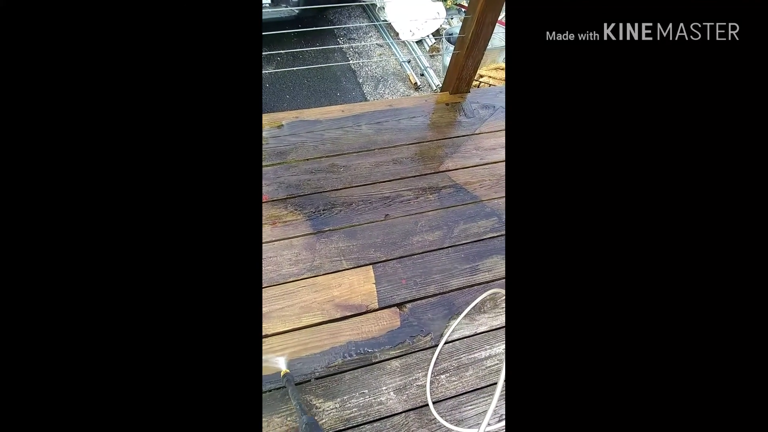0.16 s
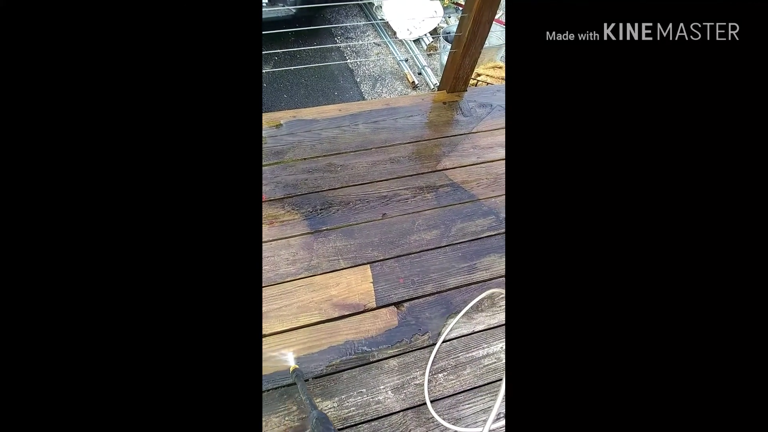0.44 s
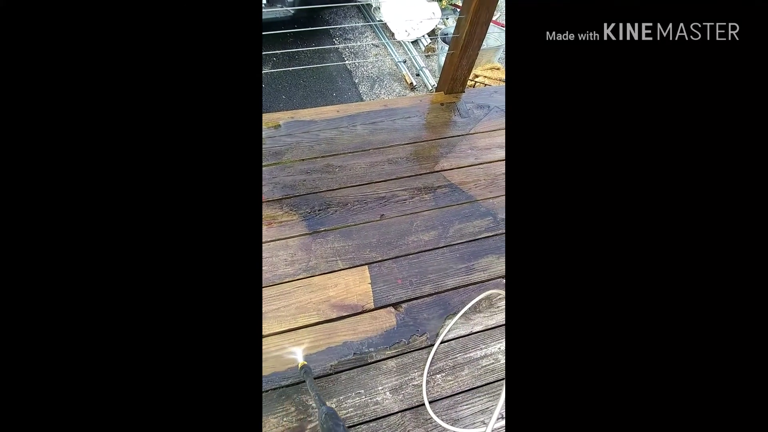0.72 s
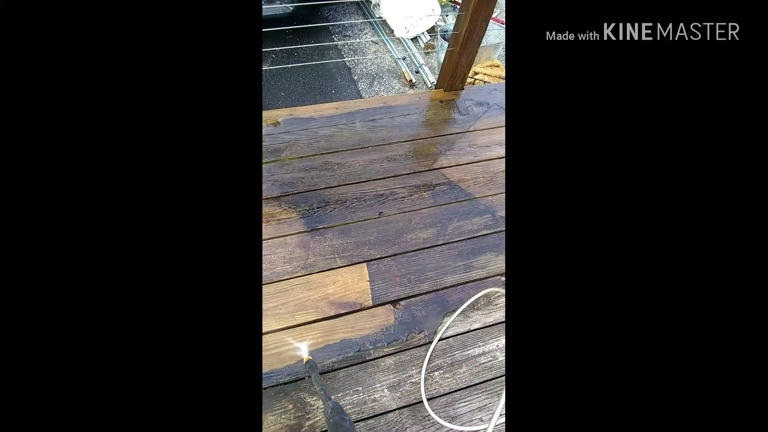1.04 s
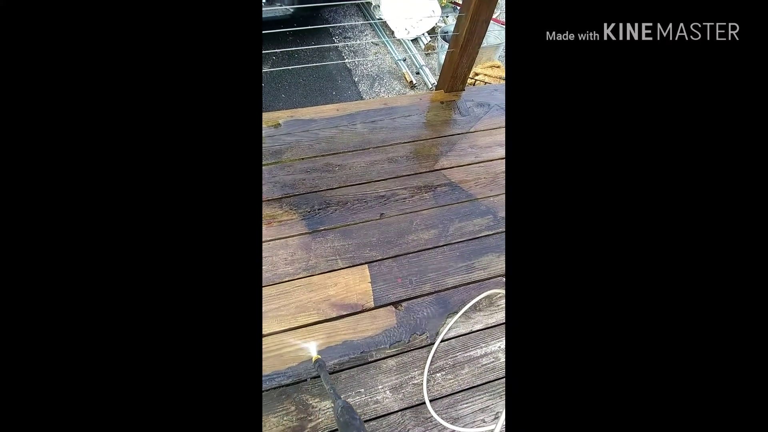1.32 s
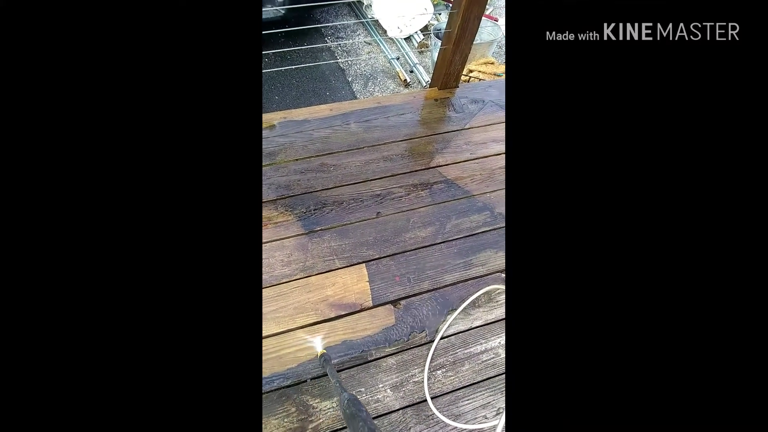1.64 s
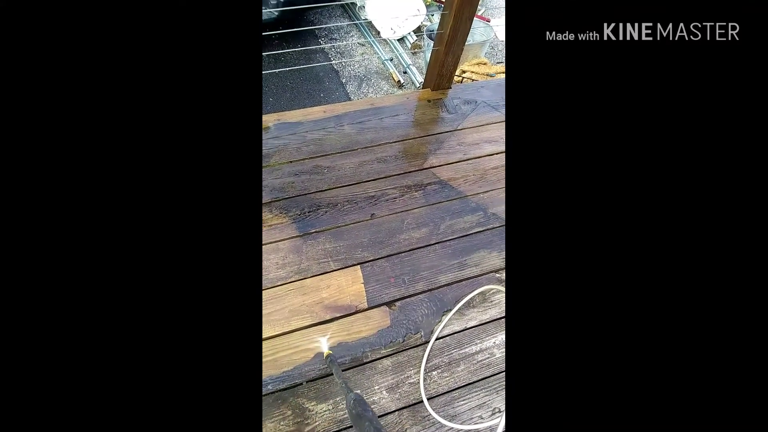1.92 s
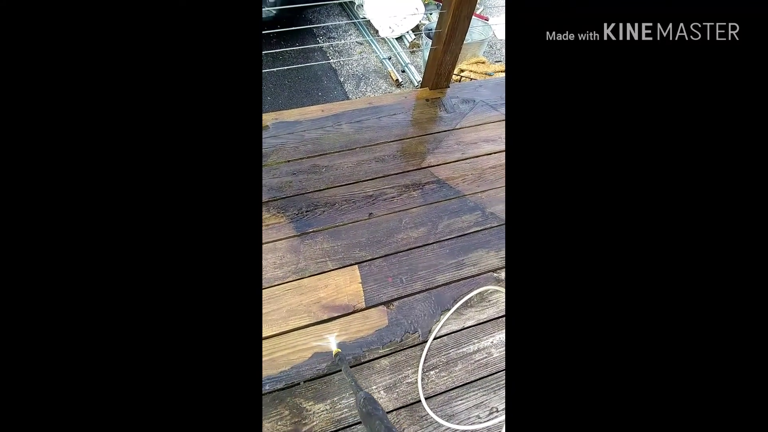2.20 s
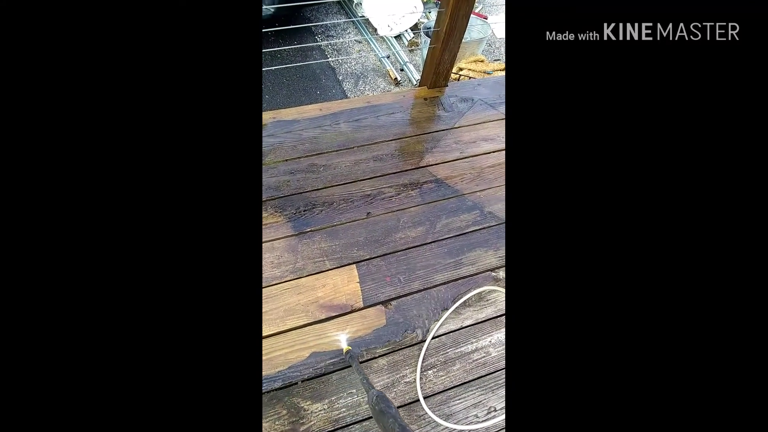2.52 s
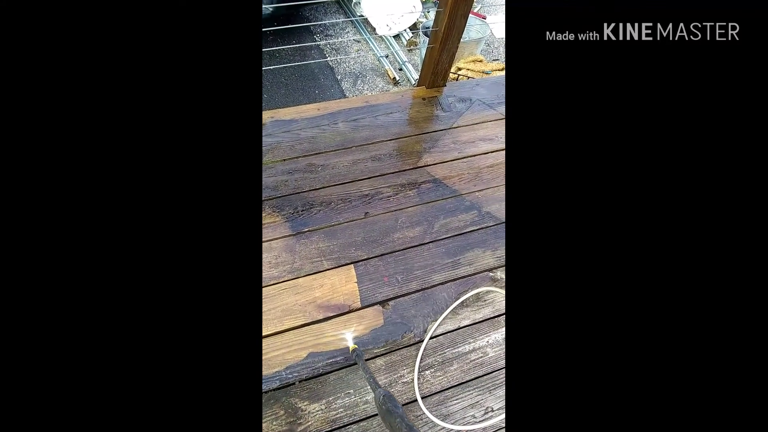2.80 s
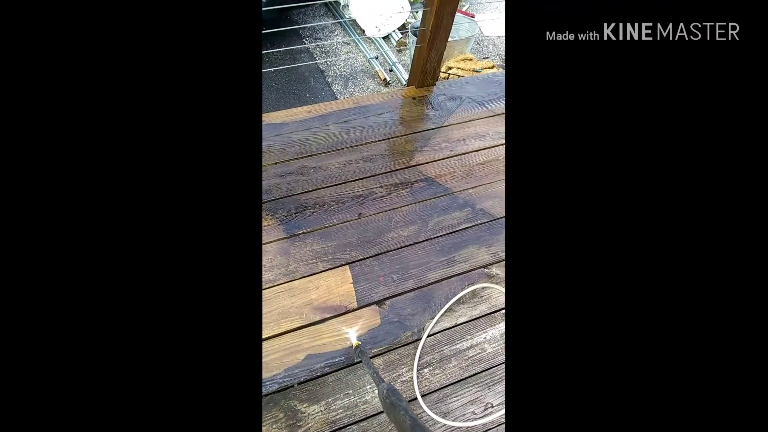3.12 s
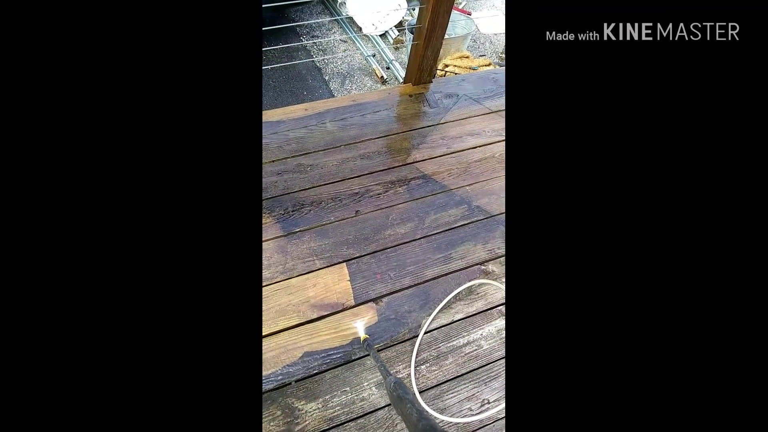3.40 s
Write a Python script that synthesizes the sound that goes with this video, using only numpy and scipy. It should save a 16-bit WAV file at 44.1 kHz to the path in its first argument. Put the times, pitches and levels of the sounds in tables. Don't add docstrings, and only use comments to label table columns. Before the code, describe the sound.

A pressure washer is already running at 0 s and continues unbroken to about 3.5 s. A broad, bright water hiss breaks on wet deck boards over a wide machine roar, low electric hum, steady high whine and faint pump throb. Splash rises near 0.2 s, spurts stronger around 1.8 s and again at 3.3 s, with brief level dips near 0.8, 1.9 and 2.3 s. Close outdoor phone pickup, slightly thinned stereo.

```python
import sys
import numpy as np
from scipy import signal
from scipy.io import wavfile
from scipy.ndimage import uniform_filter1d

SR = 44100
rng = np.random.default_rng(int(sys.argv[2]) if len(sys.argv) > 2 else 0)


def invert_db(x):
    u = np.asarray(x, float) / 20
    return 10 ** u


def unload_audio(sound):
    columns = np.transpose(np.atleast_2d(sound))
    steps = np.round(np.clip(columns, -1, 1) * 32767)
    wavfile.write(sys.argv[1], SR, steps.astype(np.int16))


N = 156555

BARS, GEAR = 22, 100
# time in seconds, pitch in Hz.
WHINE = [(0, 5846), (.2, 5844), (.45, 5848), (.7, 5853), (1.25, 5856.5), (1.7, 5854), (2.55, 5856.5),
         (2.9, 5851.5), (3.3, 5855), (3.55, 5852)]
# frequency in Hz, lead in radians.
MACHINE_LEAD = [(100, -1.3), (450, .7), (650, -.55), (1100, 0), (2490, 3.14), (3480, 6.2), (4780, 9.42),
                (8300, 18.85)]


def evened(x):
    return x / np.sqrt(np.mean(x ** 2) + 1e-20)


def read(points, hz):
    f, value = np.transpose(points)
    return np.interp(np.log(hz + 1), np.log(f + 1), value)


def drift(rate_hz, count):
    f = np.geomspace(1.5, rate_hz, count)[:, None]
    coarse = np.arange(0, N, 64)
    waves = np.sin(2 * np.pi * (f * coarse / SR + rng.random((count, 1))))
    slow = (waves / np.sqrt(f)).sum(0)
    return np.interp(np.arange(N), coarse, evened(slow))


def spray_control(axis):
    # time in seconds, jet effort in dB, splash on the boards in dB.
    run = np.array([(0, -1, -3), (.2, 0, 2.5), (.45, 0, 1.5), (.7, 0.5, 2), (1.0, 0.5, 0.5), (1.2, 0.5, 1),
                    (1.5, -1, -1), (1.8, 2, 2), (2.2, 1, -.5), (2.6, 1.5, 0.5), (2.9, 1, 0.5), (3.15, 0, 0),
                    (3.33, 1, 3.5), (3.55, -0.5, 1.5)])
    return np.interp(np.arange(N) / SR, run[:, 0], run[:, axis])


def hiss(shape_db, same, lead, right_db, patchy_db, flicker_db):
    frames = N // 128 + 5
    a, b, c, d, patches = rng.standard_normal((frames, 257, 5)).T
    patches = uniform_filter1d(patches, size=8, axis=0)
    patches = evened(uniform_filter1d(patches, size=20, axis=1))
    flicker = evened(uniform_filter1d(rng.standard_normal(frames), size=5))
    same = np.clip(same, 0, 1)[:, None]
    left = a + 1j * b
    right = same * left + np.sqrt(1 - same ** 2) * (c + 1j * d)
    right = right * (np.exp(1j * lead) * invert_db(right_db))[:, None]
    level_db = shape_db[:, None] + patchy_db * patches + flicker_db * flicker
    spectra = np.array([left, right]) * invert_db(level_db)
    return evened(signal.istft(spectra, nperseg=512, noverlap=384)[1][:, :N])


def whine_turns():
    return np.cumsum(np.interp(np.arange(N) / SR, *np.transpose(WHINE))) / SR


def motor():
    orders = [1, 11, 21.34, 21.56, 21.78, 22, 22.215]
    # left level in dB rms, right level in dB rms, lead of the right port in radians.
    tones = [(-36.5, -38.5, 0.015), (-45.5, -42, -1.72), (-59, -44, -2.1), (-57, -55, -3.6),
             (-52, -48, -3.2), (-42, -31, -1.22), (-48, -42.5, -1.3)]
    turns = whine_turns() / BARS
    out = np.zeros((2, N))
    for order, (left_db, right_db, lead) in zip(orders, tones):
        phase = 2 * np.pi * order * turns + np.array([[0], [lead]])
        level_db = np.array([[left_db], [right_db]]) + 1.08 * drift(38, count=24)
        out += invert_db(level_db) * np.sin(phase)
    return np.sqrt(2) * out


def pump():
    orders = [3, 5, 6, 7.545, 9.02, *range(11, 21), 22]
    levels = [-52, -49.5, -60.5, -54.5, -57.5, -53.5, -52.5, -51.5, -49, -48, -57, -55.5, -54, -53.5, -57,
              -60]
    turns = whine_turns() / GEAR
    out = np.zeros((2, N))
    for order, db in zip(orders, levels):
        lead = np.interp(order * WHINE[0][1] / GEAR, *np.transpose(MACHINE_LEAD))
        phase = 2 * np.pi * (order * turns + rng.random()) + np.array([[0], [lead]])
        out += invert_db(db + 1.83 * drift(15, count=16)) * np.sin(phase)
    return np.sqrt(2) * out * invert_db(np.array([[0], [-1.0]]))


def roar():
    # frequency in Hz, density in dB per Hz.
    tone = [(40, -32), (200, -8), (340, 2), (500, -9.5), (850, -0.5), (2100, -4.5), (4600, 0.5),
            (5900, -4.5)]
    # frequency in Hz, likeness from 0 to 1.
    likeness = [(40, 0.22), (250, 0.68), (520, 0.58), (1100, 1), (5100, .86), (6000, 0.083), (8300, 1),
                (15000, 0.52)]
    # frequency in Hz, right over left in dB.
    balance = [(100, -1), (350, -3.5), (600, 6), (900, -3), (1700, 3), (4800, -2), (7300, 7.5), (8600, 3.5)]
    level_db, top_hz, splash_top_hz = -26.5, 10300, 2490
    hz = np.fft.rfftfreq(512, 1 / SR)
    shape_db = read(tone, hz) - 10 * np.log10(1 + (hz / top_hz) ** 12)
    lead = np.interp(hz, *np.transpose(MACHINE_LEAD))
    sound = hiss(shape_db, read(likeness, hz), lead, read(balance, hz), patchy_db=1.04, flicker_db=0.72)
    low = signal.sosfiltfilt(signal.butter(1, splash_top_hz, fs=SR, output="sos"), sound)
    return invert_db(level_db) * (sound + (invert_db(spray_control(axis=2)) - 1) * low)


def jet():
    # frequency in Hz, density in dB per Hz.
    tone = [(5000, -25), (8300, -8.5), (9700, -9.5), (10600, 0.5), (12200, 1.5), (12900, -10.5),
            (13700, -6.5), (15000, -16.5)]
    # frequency in Hz, likeness from 0 to 1.
    likeness = [(8300, 0.13), (9300, .45), (10300, 0.63), (11400, 0.37), (12150, 0.91), (13200, 0.15),
                (14500, 0.28)]
    # frequency in Hz, right over left in dB.
    balance = [(9000, 1.5), (10400, 2.5), (11500, -13.5), (12150, 2.5), (14000, -1)]
    level_db, lag_s, in_phase_hz = -23.5, .00041, 12200
    hz = np.fft.rfftfreq(512, 1 / SR)
    lead = -2 * np.pi * lag_s * (hz - in_phase_hz)
    sound = hiss(read(tone, hz), read(likeness, hz), lead, read(balance, hz), patchy_db=1.0, flicker_db=0.56)
    return invert_db(level_db + spray_control(axis=1)) * sound


def scene():
    return motor() + pump() + roar() + jet()


def joint_stereo(x):
    edges = [0, 20, 24, 28, 32, 36, 40, 48, 56, 64, 72, 80, 88, 96, 108, 120, 132, 144, 160, 176, 196, 216, 240, 264, 292, *range(320, 609, 32),
             610]
    # frequency in Hz, level against its partner in dB.
    spare = [(800, -22), (1100, -6), (1750, -7), (2450, -3.5), (3500, -10), (4600, -1.5), (8300, -5.5),
             (12500, -10)]
    # frequency in Hz, level against the usual level of the band in dB.
    coarse = [(300, -45), (1500, -20), (2300, -4), (3100, -.5), (4200, -5), (6500, -10), (12500, -14),
              (13700, -1.5)]
    rich_times = [.27, .55, .6, .66, .78, .92, 1.22, 1.34, 1.38, 1.61, 2.47, 2.6, 2.74, 3.13]
    rich_low_times = [.18, .35, .45, .57, .65, 1.45, 1.7, 1.88, 1.92, 1.98]
    rich_db, rich_s, rich_from_hz, budget_db = 20, .024, 3200, 1.2
    low_from_hz, low_to_hz = 2550, 2800
    sum_and_difference = np.array([x[0] + x[1], x[0] - x[1]]) / 2
    hz, t, z = signal.stft(sum_and_difference, SR, "cosine", nperseg=1882, noverlap=941)
    band_db = 10 * np.log10(np.add.reduceat(abs(z) ** 2, edges, axis=1) + 1e-20)
    centre = np.convolve(hz[edges + [edges[-1]]], [.5, .5], "valid")[:, None]

    rich = (abs(t[:, None] - rich_times) < rich_s).any(axis=1) * (centre > rich_from_hz)
    rich_low = (abs(t[:, None] - rich_low_times) < rich_s).any(axis=1)
    rich = rich | rich_low * (centre > low_from_hz) * (centre < low_to_hz)
    budget = evened(uniform_filter1d(rng.standard_normal(band_db.shape[1:]), size=3))

    partner_db = band_db[::-1]
    keep = band_db - partner_db > read(spare, centre) + budget_db * budget - rich_db * rich
    keep |= band_db > partner_db
    keep[:, -1] = False
    widths = np.diff(edges + [len(hz)])
    usual_db = np.add.reduceat(20 * np.log10(abs(z) + 1e-12), edges, axis=1) / widths[:, None]
    floor = invert_db(usual_db.max(0) + read(coarse, centre) + budget_db * budget - rich_db / 2 * rich)
    z = z * np.repeat(keep, widths, axis=1) * (abs(z) > np.repeat(floor, widths, axis=0))
    mid, side = signal.istft(z, SR, "cosine", nperseg=1882, noverlap=941)[1][:, :N]
    return np.array([mid + side, mid - side])


def low_pass(x):
    return signal.sosfilt(signal.butter(12, 15270, fs=SR, output="sos"), x)


def record(dry):
    # time in seconds, depth in dB (negative lifts).
    dips = [
        (.84, 1),
        (1.04, 0.9),
        (1.24, 0.05),
        (1.80, 1.5),
        (1.895, 2),
        (2.22, -0.6),
        (2.285, 2.5),
        (3.344, 2),
    ]
    recover_s, low_cut_hz = 0.21, 58
    t = np.arange(N) / SR
    dip_db = np.zeros(N)
    for start, depth_db in dips:
        dip_db += depth_db * (t > start) * np.exp(-np.maximum(t - start, 0) / recover_s)
    gain = invert_db(-uniform_filter1d(dip_db, size=200))
    cut = signal.sosfilt(signal.butter(2, low_cut_hz, "high", fs=SR, output="sos"), dry)
    mix = joint_stereo(cut * gain)
    return low_pass(mix)


dry = scene()
out = record(dry)
unload_audio(out)
```